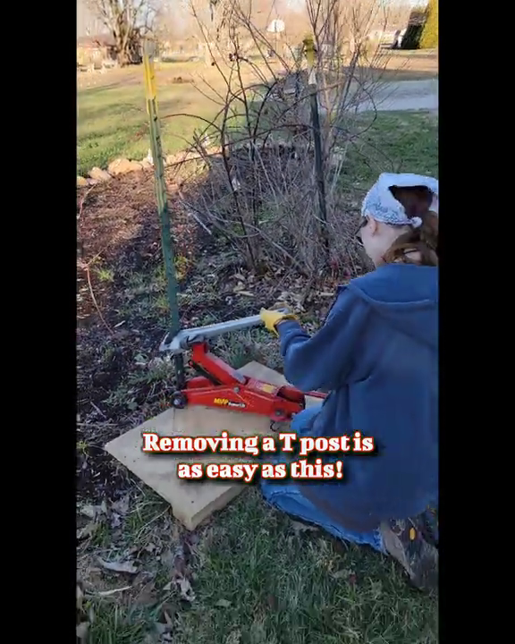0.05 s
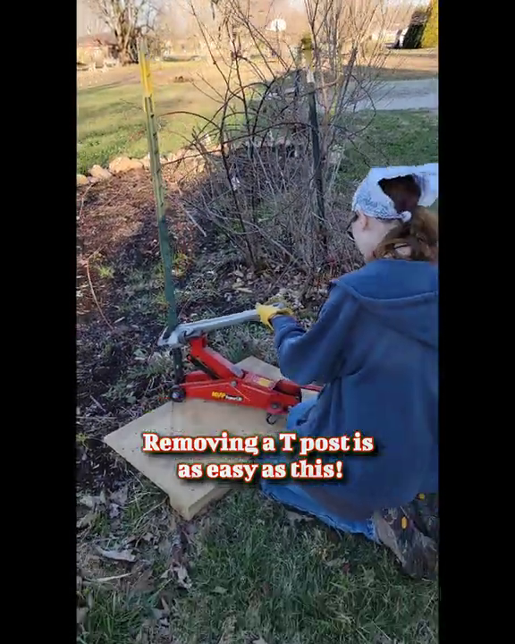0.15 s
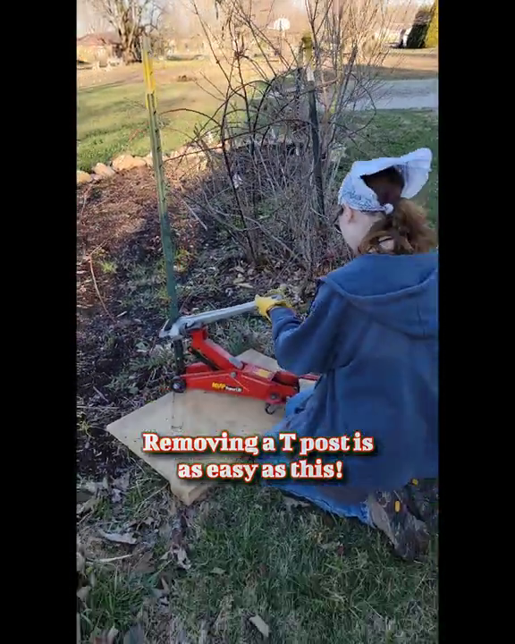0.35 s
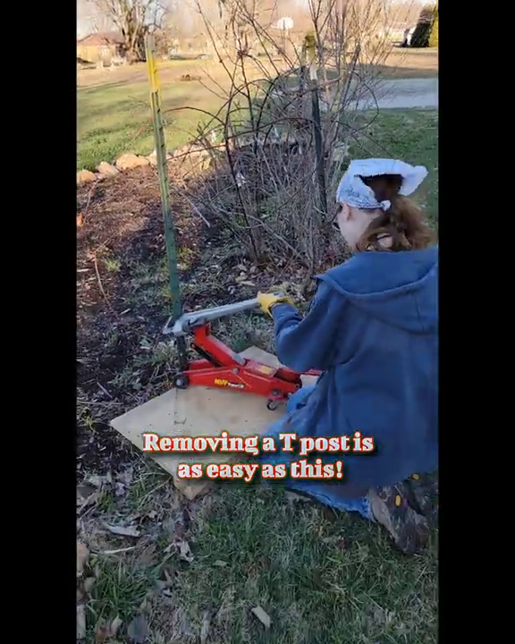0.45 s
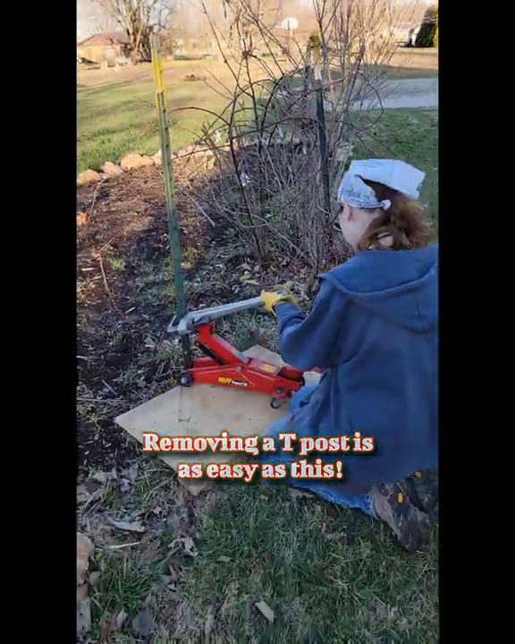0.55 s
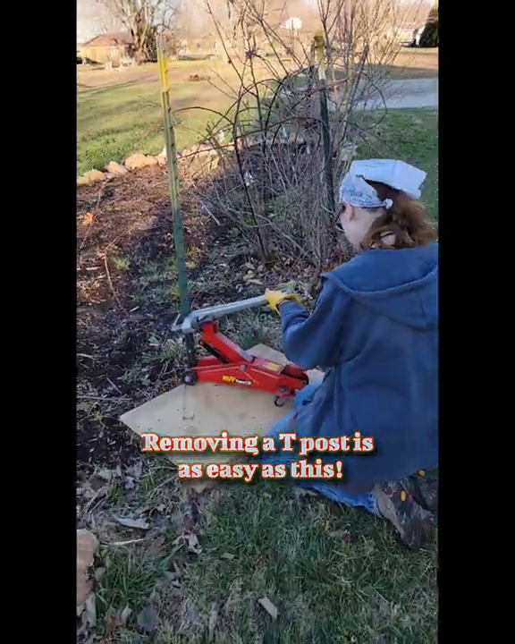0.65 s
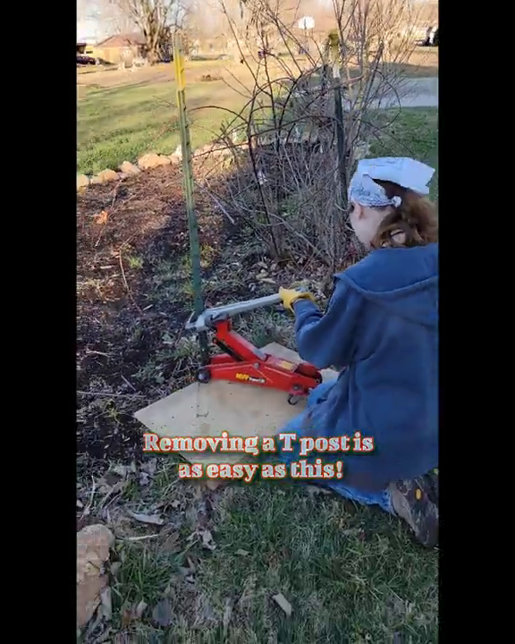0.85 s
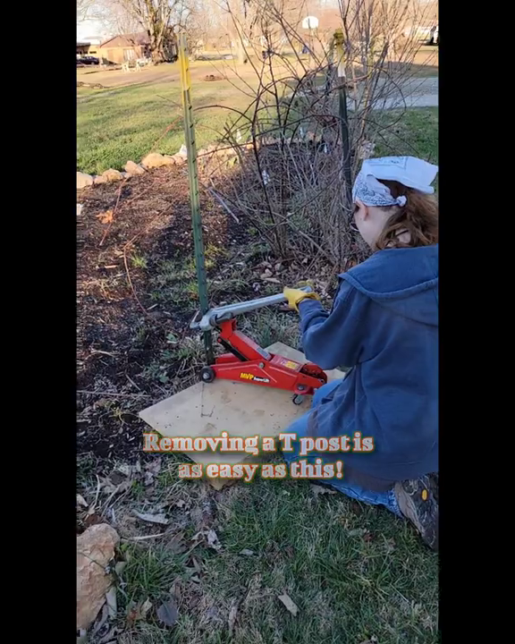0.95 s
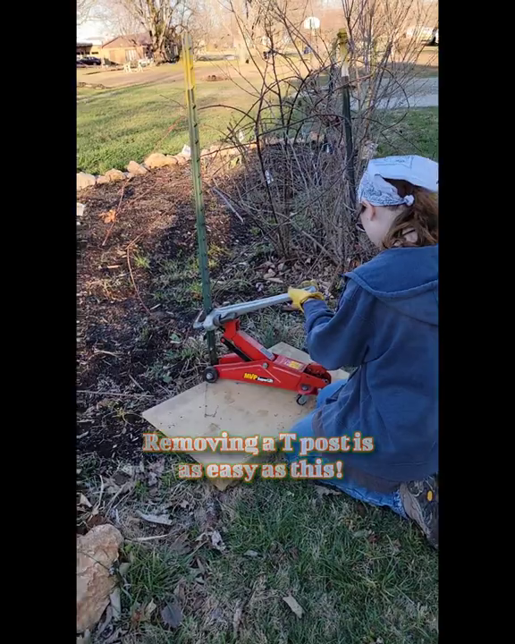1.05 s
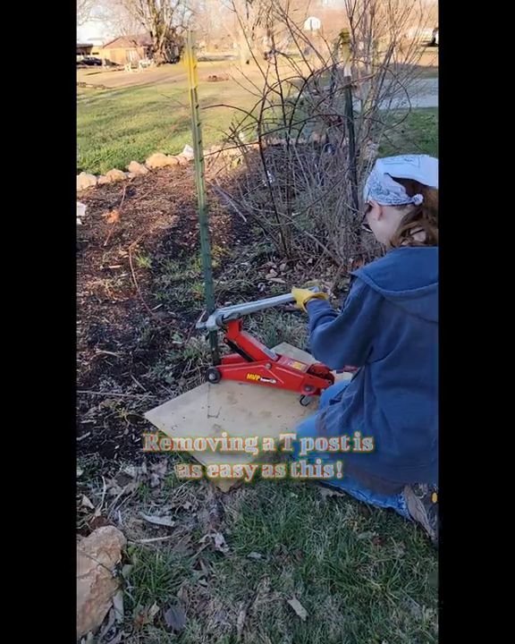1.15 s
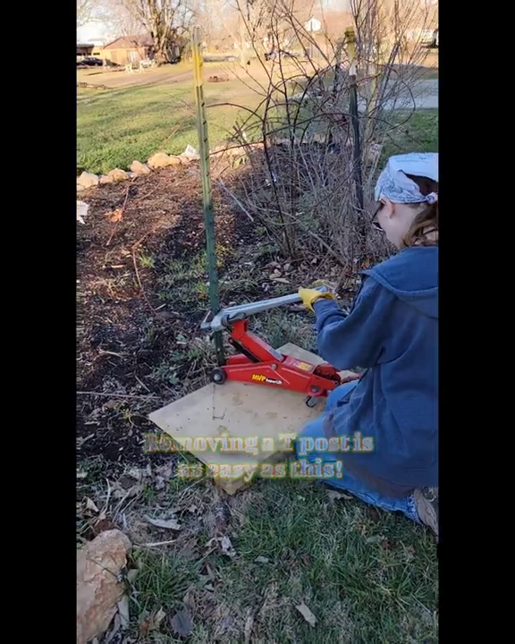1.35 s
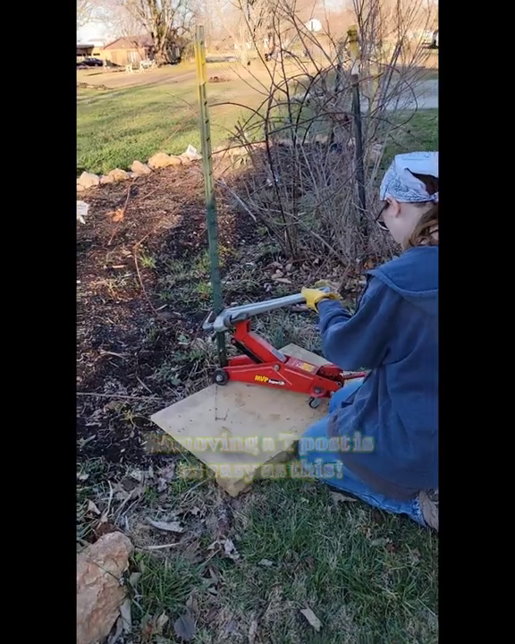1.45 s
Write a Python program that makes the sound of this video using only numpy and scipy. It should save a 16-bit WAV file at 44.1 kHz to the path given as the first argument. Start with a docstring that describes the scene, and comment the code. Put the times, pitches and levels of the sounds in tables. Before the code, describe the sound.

A metal jack handle clanks sharply outdoors, followed by softer rattling over low wind.

```python
"""In a garden, a steel floor jack is worked close by. Its handle catches with a ping and lands with one
hard clank: steel crashes on steel, the frame thumps its board, and the hollow handle sings on faintly.
Later the loose linkage rattles and a small pin chinks; metal, board and dry leaves tick lightly.
A far bird whistles rising notes, and wind rumbles on the microphone over a soft outdoor hiss."""
import sys
import numpy as np
from scipy import signal
from scipy.fft import rfft, irfft
from scipy.io import wavfile

SR = 44100
rng = np.random.default_rng(int(sys.argv[2]) if len(sys.argv) > 2 else 0)


def generate_wav(signal):
    """Clip the signal to [-1, 1] and save it as 16-bit WAV at the path in sys.argv[1]."""
    frames = np.transpose(np.atleast_2d(signal))
    scaled = np.clip(frames, -1, 1) * 32767
    pcm = np.round(scaled).astype(np.int16)
    wavfile.write(sys.argv[1], SR, pcm)


N = 66150
T = np.arange(SR) / SR
PORT_LAG_S, LIKENESS = 0.00009, 0.36  # left microphone port's lag; stereo likeness of the hits' noise

# steel-on-steel hits of the clank: t/s, level/dB, brightness/(dB/octave), weight on frame/dB, chatter/s
CONTACTS = [(0.2403, -25.5, 4, -12.5, 0.0024), (0.2505, -25, -3, -10, 0.00064),
            (0.2534, -13.5, 3.5, -0.5, 0.0035), (0.264, -30, -0.5, -13, 0.0012)]
# ping of the handle catching in its socket: f/Hz, level/dB
CATCH_MODES = [(2120, -23.5), (2775, -17.5), (4590, -21)]
# tone colour of each hit's dense crash: f/Hz, level/dB
CRASH_COLOUR = [(150, -21), (250, 3), (480, -30), (900, 10), (1450, -5), (2100, 5), (3100, 1), (3900, 1),
                (7000, -5), (8300, -13), (10500, -20.5), (12000, -12), (15000, -16)]
# decay of that crash: f/Hz, t60/s
CRASH_DECAY = [(2000, 0.077), (5000, 0.031), (14000, 0.057)]
# thump of the frame on its board: f/Hz, level/dB, t60/s
FRAME_MODES = [(236, -6.5, 0.048), (253.5, 0.5, 0.05), (305.6, 3, 0.053), (342, -30, 0.019)]
# clang of the steel arm and handle: f/Hz, level/dB, left minus right/dB
STEEL_MODES = [(688, -2, 5), (1085, -4, -5), (1120, -3, -5), (1185, -2, -3), (1320, -8, -4), (1809, -5, -5),
               (1859, -9, -5), (1978, -11, -4), (2156, -7, -7), (2356, -11, -4), (2592, -7, 0),
               (2664, -2, 9), (2830, -5, 0), (4390, -11, -9), (4523, -10, -8), (6760, -13, 6),
               (7080, -13, 6)]
# after-ring of the hollow handle: f/Hz, level/dB
HANDLE_MODES = [(651, -48), (1125, -55), (1680, -53), (1787, -48), (1868, -44), (1992, -49), (2067, -52),
                (2186, -53), (2918, -43), (2988, -49)]
# linkage rattles and scrapes: t/s, level/dB, rise/s, t60/s, brightness/(dB/octave), pin/dB, body/dB
CLACKS = [(0.834, -47, 0.0013, 0.15, -3.5, -46, -9), (.931, -46.5, 0.0012, 0.44, -4.5, -38, -9),
          (0.992, -39, 0.0043, 0.16, -0.5, -21, -3), (1.0382, -29, 0.0065, 0.063, 4, -14.5, -15),
          (1.0486, -42, 0.0035, 0.13, -2, 6, 2)]
# tone colour of their grit: f/Hz, level/dB
CLACK_COLOUR = [(100, 3.5), (250, 1.5), (900, 4), (1600, 1.5), (4600, 3), (5600, -3.5), (6400, 4.5),
                (9000, -15.5), (14000, -7.5)]
# chink of the small pin: f/Hz, level/dB, t60/s
PIN_MODES = [(2300, 2, .03), (6290, -6, .06), (11440, -5, .06), (14935, 10, .048)]
# ring of the jack's hollow body: f/Hz, level/dB
BODY_MODES = [(240, -9), (610, -8), (662, -7), (745, -8), (1170, -9), (1565, -1.5)]
# light ticks and rustles: t/s, level/dB, centre f/Hz, width/octaves, t60/s
TICK_BURSTS = [(.002, -48.5, 3960, 1.9, 0.13), (.07, -40.5, 308, 0.42, 0.041),
               (0.099, -47, 1097, 0.039, 0.048), (.13, -41.5, 5400, 0.52, 0.027),
               (0.2245, -36, 10000, 4.5, 0.059), (0.836, -45.5, 4540, 0.022, 0.018),
               (0.994, -40.5, 6330, 0.028, 0.065), (1.115, -54, 7060, 0.37, 0.061),
               (1.147, -53.5, 6300, 0.47, 0.12)]
# the bird's rising calls: t/s, level/dB
RISING_CALLS = [(.79, -58), (1.155, -55.5), (1.403, -63)]
# its held notes: t/s, length/s, f/Hz, level/dB
HELD_NOTES = [(1.36, 0.05, 1540, -66), (1.478, 0.053, 1780, -55.5)]
# gusts at the two ports: t/s, left level/dB, right level/dB
GUSTS = [(0, -41, -43), (.31, -36, -44), (0.599, -40.5, -39.5), (0.656, -29.5, -39.5),
         (0.701, -42.5, -36.5), (0.846, -42, -37), (0.9, -45.5, -37.5), (0.949, -45.5, -31.5),
         (1.03, -45, -40), (1.19, -42.5, -31.5), (1.351, -44, -40)]
# tone colour of the wind: f/Hz, level/dB
WIND_COLOUR = [(15, -8.5), (45, -5), (62, 0.5), (115, -9.5), (160, -17), (500, -43.5), (1500, -57)]
# tone colour of the outdoor hiss: f/Hz, level/dB
HISS_COLOUR = [(250, 1), (650, 2), (2100, -2.5), (4500, -11), (6500, -7), (9500, -20), (13000, -12),
               (15500, -27)]
# fader curve of the hiss: t/s, level/dB
HISS_LEVEL = [(0, -55), (.8, -60), (1.5, -61.5)]
# decay of the garden's far tail: f/Hz, t60/s
GARDEN_DECAY = [(200, 0.2), (1000, 0.91), (2700, 0.85), (4500, 0.073)]


def clank(rise_s=0.001, steel_t60=0.068, damping_hz=4910, low_cut_hz=194):
    """Catch, hits and after-ring: each hit chatters into a crash, clangs the steel and thumps the frame."""
    out = handle()
    frame = sum(ring(*mode, pan_db=-5.5) for mode in FRAME_MODES)
    t = T[:SR // 4]
    for s, db, tilt, weight_db, chatter_s in CONTACTS:
        # lighter hits have less low end
        colour = lambda f: curve(CRASH_COLOUR, f) + weight_db / (1 + (f / 1000) ** 2)
        crash = fade(noise(colour, len(t), LIKENESS, tilt), CRASH_DECAY, hold_s=chatter_s)
        add(out, s, amp(db) * crash * np.minimum(t / rise_s, 1))
        steel = 0
        for hz, level, pan_db in STEEL_MODES:
            t60 = steel_t60 / (1 + (hz / damping_hz) ** 2)  # high modes die sooner
            steel += ring(hz, level + tilt * np.log2(hz / 2500), t60, pan_db) * rng.choice([-1, 1])
        add(out, s, amp(db) * (steel + amp(weight_db) * frame) * np.minimum(2 * T / chatter_s, 1))
    return signal.sosfilt(signal.butter(6, low_cut_hz, "high", fs=SR, output="sos"), out)


def handle(catch_s=0.2395, rise_s=0.0016, sing_s=0.256, sing_t60=0.64, beat_hz=5, twin_db=-9):
    """The hollow handle pings as it catches in its socket, then sings on in slowly beating pairs."""
    out = np.zeros((2, N))
    ping = sum(ring(hz, db, t60=0.061) for hz, db in CATCH_MODES)
    add(out, catch_s, ping * np.minimum(T / rise_s, 1))
    for hz, db in HANDLE_MODES:
        twin = ring(hz + beat_hz * rng.uniform(0.55, 1.7), db + twin_db, sing_t60)
        add(out, sing_s, ring(hz, db, sing_t60, pan_db=-6) + twin)
    return out


def linkage(pan_db=-2):
    """Loose links make short gritty clacks that ring the hollow body and sometimes chink the pin."""
    out = np.zeros((2, N))
    pin = sum(ring(*mode) for mode in PIN_MODES)
    for s, db, rise, t60, tilt, pin_db, body_db in CLACKS:
        grit = noise(lambda f: curve(CLACK_COLOUR, f), SR // 4, LIKENESS, tilt)
        add(out, s, amp(db) * envelope(rise, t60) * grit)
        body = sum(ring(hz, level, t60=0.12) * rng.choice([-1, 1]) for hz, level in BODY_MODES)
        add(out, s, amp(db + pin_db) * pin + amp(db + body_db) * body * np.minimum(T / rise, 1))
    return out * pan(pan_db)


def ticks(rise_s=0.00065):
    """Metal, board and dry leaves give small noise bursts, each around its own pitch."""
    out = np.zeros((2, N))
    for s, db, hz, width, t60 in TICK_BURSTS:
        colour = lambda f: -20 * np.log10(1 + (np.log2((f + 1) / hz) / width) ** 2)
        add(out, s, amp(db) * envelope(rise_s, t60) * noise(colour, SR // 4, LIKENESS))
    return out


def bird(slide_s=0.056, pip_s=0.034, pip_hz=3090, pip_db=-6):
    """Each rising call slides up and ends on a short high pip; other notes hold their pitch."""
    out = np.zeros((2, N))
    for s, db in RISING_CALLS:
        add(out, s, whistle(slide_s, start_hz=1810, end_hz=2330, db=db))
        add(out, s + slide_s, whistle(pip_s, pip_hz, pip_hz, db + pip_db))
    for s, length, hz, db in HELD_NOTES:
        add(out, s, whistle(length, hz, hz, db))
    return out


def whistle(length, start_hz, end_hz, db, glide_at=0.42, glide_share=0.093):
    """A pure note that swells and fades while gliding from one pitch to the other."""
    progress = np.arange(0, 1, 1 / (length * SR))
    hz = start_hz + (end_hz - start_hz) * (1 + np.tanh((progress - glide_at) / glide_share)) / 2
    return (amp(db) * np.sin(np.pi * progress) * np.sin(2 * np.pi * np.cumsum(hz) / SR))[None]


def garden(x, near_db=-18.5, near_t60=0.24, far_db=-24, build_s=0.0092, echo_s=0.04, echo_db=-24):
    """Reverb: quick scatter from ground and bushes, one soft echo, then a faint far tail."""
    near = noise(np.zeros_like, SR, tilt=-1.1) * amp(-60 * T / near_t60)
    far = fade(noise(np.zeros_like, SR, tilt=-1.1), GARDEN_DECAY)
    onset = np.minimum(T / build_s, 1) ** 2
    tail = (amp(near_db) * unit_rms(near * onset) + amp(far_db) * unit_rms(far * onset)) / np.sqrt(SR)
    tail[:, round(echo_s * SR)] += amp(echo_db)
    return signal.fftconvolve(x, tail, axes=1)[:, :N]


def wind():
    """Gusts buffet each microphone port separately with a low rumble."""
    t = np.arange(N) / SR
    s, left, right = np.transpose(GUSTS)
    gusts = amp([np.interp(t, s, left), np.interp(t, s, right)])
    return gusts * noise(lambda f: curve(WIND_COLOUR, f), N, likeness=0.29)


def hiss():
    """A wide, soft bed of outdoor air that eases down."""
    level_db = np.interp(np.arange(N) / SR, *np.transpose(HISS_LEVEL))
    return amp(level_db) * noise(lambda f: curve(HISS_COLOUR, f), N, likeness=0.036)


def ring(hz, db, t60, pan_db=0):
    """One dying mode, reaching the left port slightly late."""
    t = np.maximum(T - np.array([[PORT_LAG_S], [0]]), 0)
    return pan(pan_db) * amp(db - 60 * t / t60) * np.sin(2 * np.pi * hz * t)


def noise(colour, size, likeness=0, tilt=0):
    """Stereo noise at unit RMS; colour gives dB at each frequency, tilt adds dB per octave."""
    hz = np.fft.rfftfreq(size, 1 / SR)
    shared, separate = rfft(rng.standard_normal((2, size)))
    left = shared * np.exp(-2j * np.pi * hz * PORT_LAG_S)
    right = likeness * shared + np.sqrt(1 - likeness ** 2) * separate
    gain = amp(colour(hz) + tilt * np.log2(np.maximum(hz, 200)))
    return unit_rms(irfft(np.array([left, right]) * gain, size))


def fade(x, decay, hold_s=0):
    """Holds x, then lets each octave die at its own speed."""
    hz, spectrum = np.fft.rfftfreq(x.shape[1], 1 / SR), rfft(x)
    centres = np.geomspace(125, 16000, 8)
    t = np.maximum(T[:x.shape[1]] - hold_s, 0)
    out = 0
    for centre, weights in zip(centres, np.eye(len(centres))):
        band = irfft(spectrum * curve(list(zip(centres, weights)), hz), len(t))
        out += band * amp(-60 * t / curve(decay, centre))
    return out


def envelope(rise, t60):
    """Linear attack, exponential decay."""
    t = T[:SR // 4]
    return np.minimum(t / rise, 1) * amp(-60 * np.maximum(t - rise, 0) / t60)


def curve(points, hz):
    """Value at hz, drawn between points on a log frequency axis."""
    f, value = np.transpose(points)
    return np.interp(np.log(hz + 1), np.log(f), value)


def amp(db):
    return 10 ** (np.asarray(db) / 20)


def unit_rms(x):
    return x / np.sqrt(np.mean(x ** 2) + 1e-20)


def pan(db):
    """Stereo gains; positive dB leans left."""
    return amp(np.array([[db], [-db]]) / 2)


def add(mix, s, sound):
    """Lays a sound into the mix at s seconds."""
    part = mix[:, max(round(s * SR), 0):][:, :sound.shape[1]]
    part += sound[:, :part.shape[1]]


def scene(jack_send_db=-4, bird_send_db=2):
    """The jack is close and fairly dry; the bird sits deeper in the garden's reverb."""
    jack = clank() + linkage() + ticks()
    song = bird()
    reverb = garden(amp(jack_send_db) * jack + amp(bird_send_db) * song)
    return jack + song + reverb + wind() + hiss()


def record(dry, high_cut_hz=15600):
    """Peaks clip at full scale, then a steep filter trims the very top."""
    high_cut = signal.firwin(255, high_cut_hz, window=("kaiser", 9), fs=SR)
    return signal.oaconvolve(np.clip(dry, -1, 1), high_cut[None], "same")


dry = scene()
out = record(dry)
generate_wav(out)
```